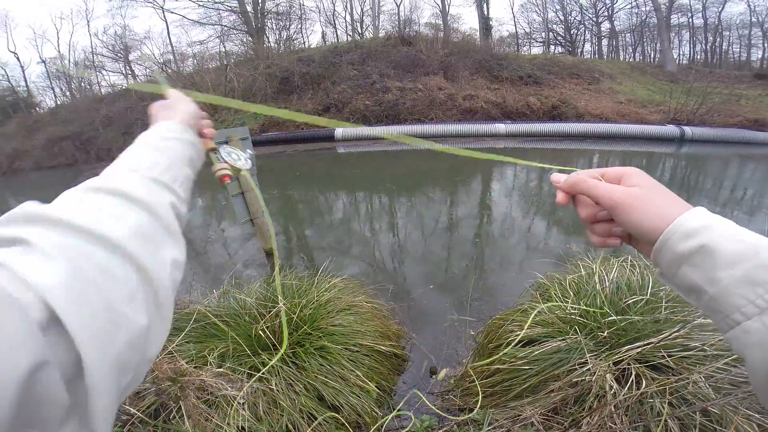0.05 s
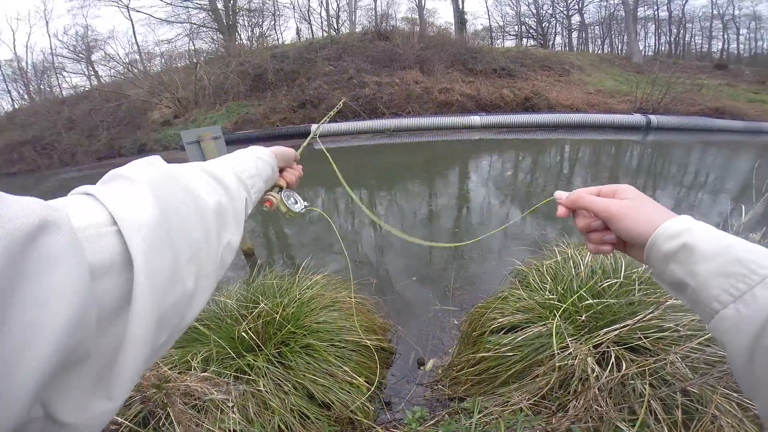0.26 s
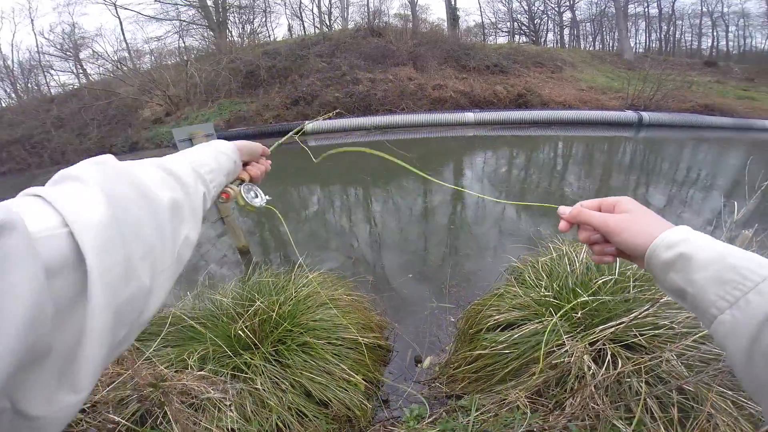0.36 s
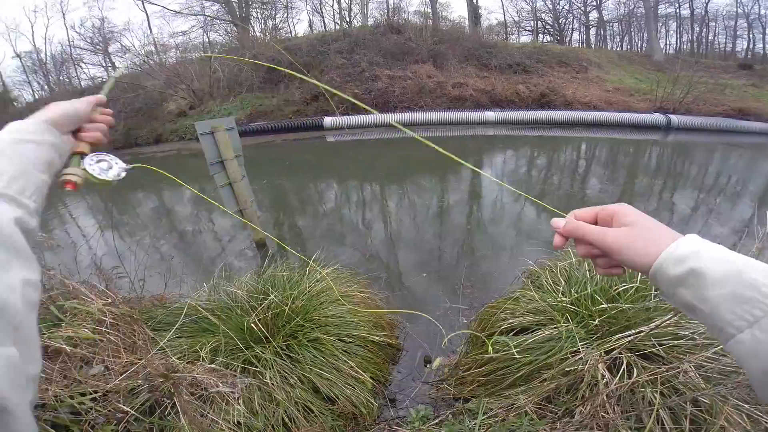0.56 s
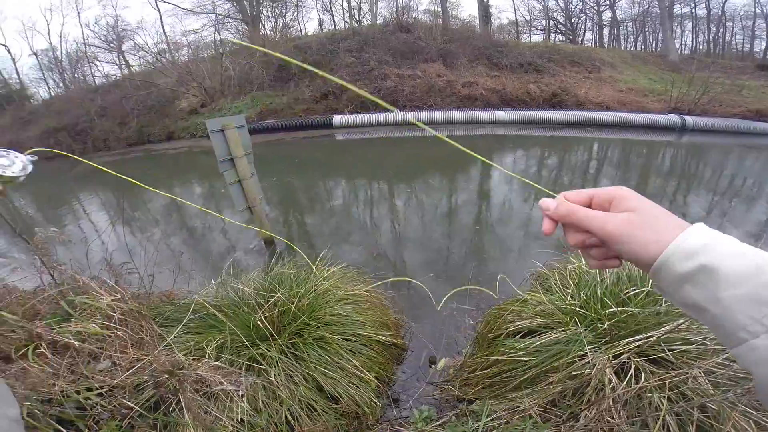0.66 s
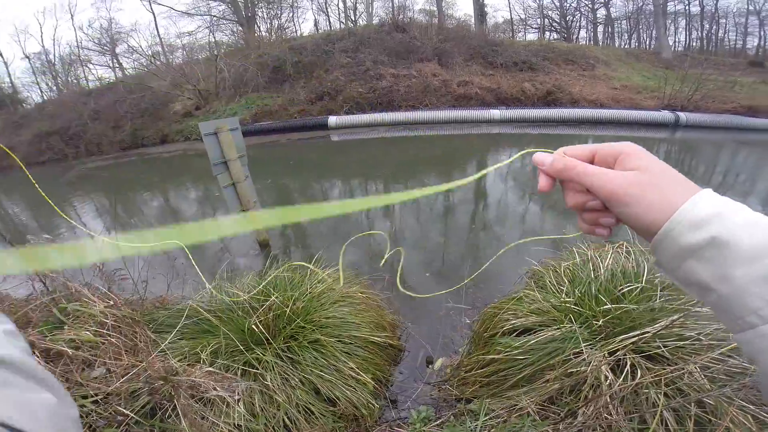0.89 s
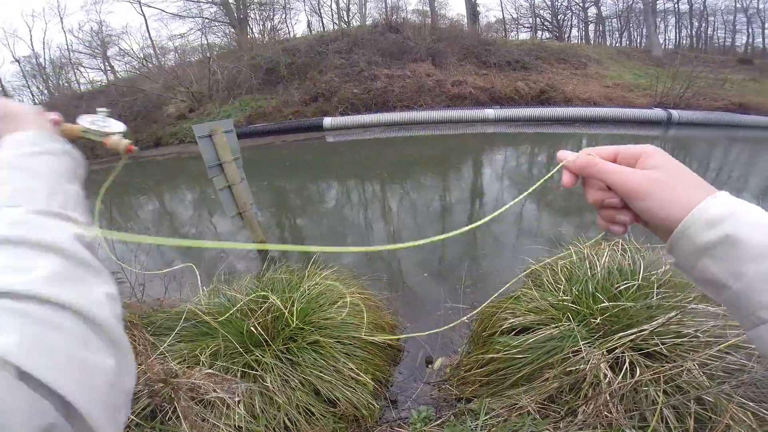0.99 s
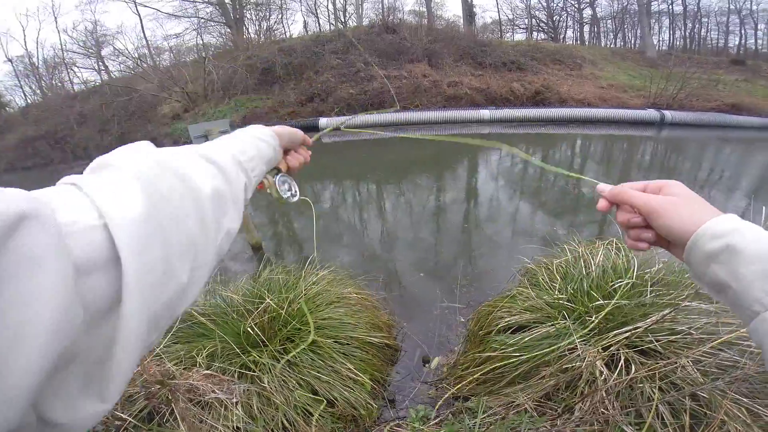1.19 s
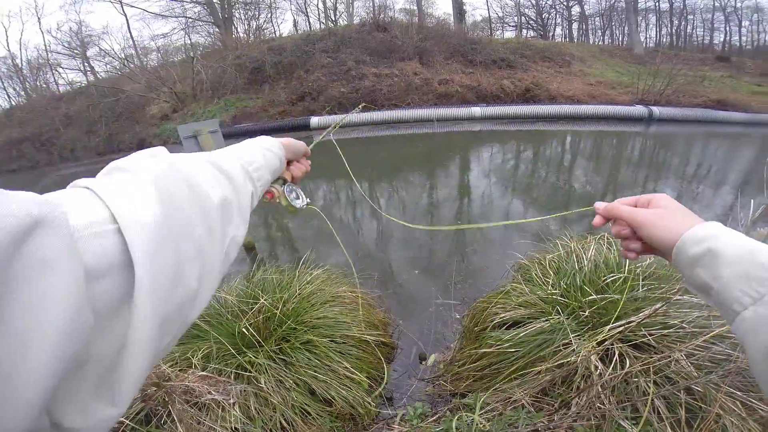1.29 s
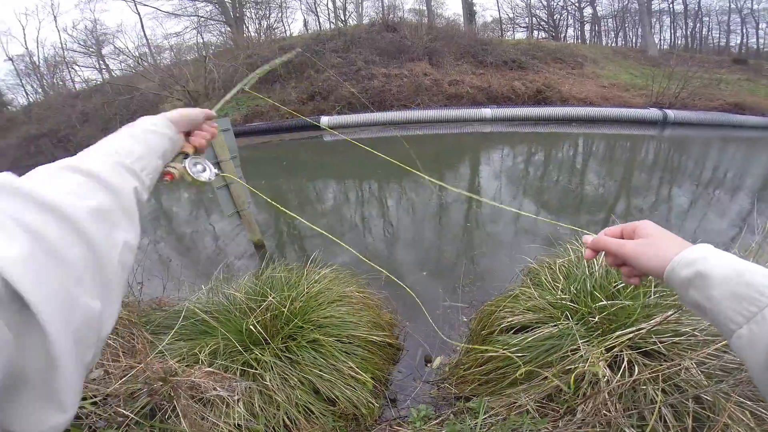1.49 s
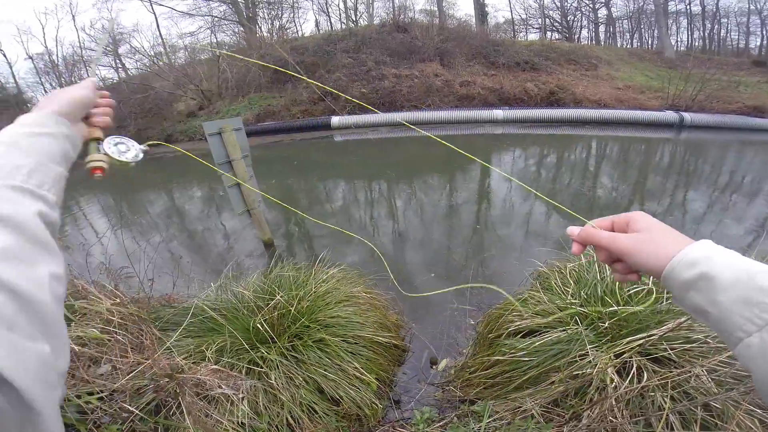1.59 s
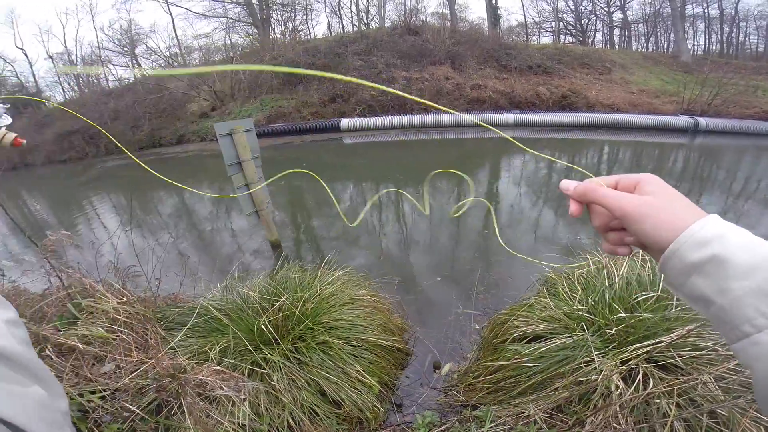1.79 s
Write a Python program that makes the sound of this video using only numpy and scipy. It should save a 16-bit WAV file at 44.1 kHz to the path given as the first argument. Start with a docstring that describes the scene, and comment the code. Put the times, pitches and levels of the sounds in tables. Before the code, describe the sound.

Fishing line rasps through a fly rod's rings from the start to 0.4 seconds, with a sharp, hollow reel knock at 0.2. A shorter rasp follows around 0.6. The reel knocks twice near 1.3 and 1.4, then ticks faintly as the line rasps again, peaking at 1.6. A sleeve rumbles and flaps softly close by. Behind are quiet open air, a very faint bird and a barely audible electronic whine.

```python
"""Fly rod false casts on a canal bank

Heard from a small camera worn on the chest. The line rasps through the rod rings on each stroke,
the reel knocks and ticks, and the sleeve and moving air rumble.
Behind it: quiet open air, a faint distant bird and a thin electronic whine."""
import sys
import numpy as np
from scipy import signal
from scipy.fft import rfft, irfft, next_fast_len
from scipy.io import wavfile
from scipy.ndimage import uniform_filter1d

SR = 44100
rng = np.random.default_rng(int(sys.argv[2]) if len(sys.argv) > 2 else 0)


def output_pcm(signal):
    """Save a mono or channel-first signal as 16-bit PCM at the path in sys.argv[1].

    Samples are clipped to [-1, 1] before scaling.
    """
    pcm = np.clip(np.atleast_2d(signal).T, -1, 1) * 32767
    wavfile.write(sys.argv[1], SR, np.round(pcm).astype(np.int16))


N = 81585

# rod resonances, for line rasp and knock tails: f/Hz, relative level/dB
ROD_SPECTRUM = [(250, -25), (600, -19), (800, -15), (1100, -14), (1400, -1.5), (1750, 1), (2100, -5.5),
                (2350, -3), (2880, -3), (3300, -15.5), (4550, -16), (5400, -20), (6600, -20), (8200, -30.5),
                (9700, -25), (11500, -26.5), (12800, -39.5), (15000, -44.5)]


def undb(db):
    return 10 ** (np.asarray(db) / 20)


def unit(x):
    """Scale to rms 1."""
    return x / np.sqrt(np.mean(x ** 2))


def curve(rows):
    """Join (t/s, value) rows by straight lines."""
    return np.interp(np.arange(N) / SR, *np.array(rows).T)


def colour(x, spectrum):
    """Minimum-phase filter from (f/Hz, level/dB) rows; output rms 1."""
    hz, db = np.array(spectrum).T
    size = 2 * next_fast_len(N)
    bins_hz = np.maximum(np.fft.rfftfreq(size, 1 / SR), 1)
    gain = undb(np.interp(np.log(bins_hz), np.log(hz), db))
    cepstrum = irfft(np.log(gain))
    cepstrum[size // 2:] = 0
    return unit(irfft(rfft(x, size) * np.exp(2 * rfft(cepstrum)))[:N])


def noise(spectrum):
    """Coloured noise, rms 1."""
    return colour(rng.standard_normal(N), spectrum)


def wander(rate_hz):
    """Smoothed random steps, rms 1."""
    hold = int(SR / rate_hz)
    steps = rng.standard_normal(N)[np.arange(N) // hold]
    return unit(uniform_filter1d(uniform_filter1d(steps, hold), hold))


def since(start_s):
    """Seconds after the start, zero before."""
    return np.maximum(np.arange(N) / SR - start_s, 0)


def sine(hz, age_s):
    return np.sin(2 * np.pi * hz * age_s)


def fade(age_s, t60_s):
    """Exponential decay from contact."""
    return (age_s > 0) * np.exp(-np.log(1000) * age_s / t60_s)


def swell(age_s, rise_s, shape):
    """Reaches 1 at rise_s, then decays."""
    return (age_s / rise_s * np.exp(1 - age_s / rise_s)) ** shape


def open_air():
    """Steady, dull outdoor noise."""
    # f/Hz, relative level/dB
    air_spectrum = [(15, -58), (25, -3), (55, -22.5), (116, -13.5), (209, -16), (433, -20), (631, -21),
                    (782, -22.5), (1270, -24.5), (1850, -29), (4620, -32.5), (8580, -39.5), (15500, -46.5)]
    return undb(-61) * noise(air_spectrum)


def camera_whine():
    """Thin, steady electronic tones."""
    # f/Hz, rms level/dB
    tones = [(8781, -75.5), (14625, -80), (14655, -89)]
    return sum(np.sqrt(2) * undb(db) * sine(hz, since(0)) for hz, db in tones)


def bird():
    """Distant gliding, fluttering notes, scattered by trees."""
    # t/s, length/s, start f/Hz, target f/Hz, level/dB, glide time constant/note length
    notes = [(0.732, .025, 5300, 5500, -60, 0.83), (0.786, 0.013, 5800, 4600, -65.5, .9),
             (1.038, .055, 7400, 4600, -62.5, .15), (1.093, 0.051, 5350, 4000, -63.5, .7),
             (1.152, 0.037, 4630, 4930, -63, .9), (1.37, 0.037, 5800, 4880, -60, 0.77)]
    flutter_db, scatter_db = 3, -6
    song, waver = np.zeros(N), 1 + .022 * wander(600)
    for start_s, length_s, from_hz, to_hz, db, glide in notes:
        progress = np.minimum(since(start_s) / length_s, 1)
        hz = (to_hz + (from_hz - to_hz) * np.exp(-progress / glide)) * waver
        envelope = np.sqrt(np.abs(np.sin(np.pi * progress)))
        song += undb(db) * envelope * np.sin(2 * np.pi * np.cumsum(hz) / SR)
    song *= unit(undb(flutter_db * wander(150)))
    echoes = rng.standard_normal(N) * fade(since(0), t60_s=.4)
    return song + undb(scatter_db) * signal.fftconvolve(song, echoes / np.linalg.norm(echoes))[:N]


def jacket():
    """Sleeve and air buffet as the arm swings; now and then the cloth flaps."""
    # buffeting envelope: t/s, relative level/dB
    swing = [(0, -62), (.06, -67.5), (.11, -52), (.2, -47.5), (.24, -42.5), (.3, -51.5), (.35, -54),
             (.45, -67.5), (.57, -53), (.7, -62.5), (1.03, -71), (1.25, -60), (1.35, -50.5), (1.41, -58.5),
             (1.53, -54), (1.63, -47.5), (1.77, -61.5), (1.85, -54)]
    # f/Hz, relative level/dB
    buffet_spectrum = [(25, -7.5), (55, -5.5), (85, -2.5), (115, 2.5), (160, -12.5), (230, -14), (330, -20),
                       (600, -27.5), (1300, -55)]
    # f/Hz, relative level/dB
    rustle_spectrum = [(100, -1), (230, 5), (400, -9.5), (1800, -9), (6000, -35), (15000, -44.5)]
    # t/s, level/dB, f/Hz
    flaps = [(0.149, -40.5, 189), (0.811, -44, 138), (.945, -47, 113), (1.17, -49, 178.2)]
    out = noise(buffet_spectrum) * undb(curve(swing) + 3)
    rustle = undb(-11) * noise(rustle_spectrum)
    for start_s, db, hz in flaps:
        age_s = since(start_s)
        out += undb(db) * swell(age_s, rise_s=.0038, shape=.87) * (sine(hz, age_s) + rustle)
    return out


def reel():
    """Each knock: sharp crack, hollow ring with short side modes, low thump, faint tail."""
    # t/s, ring level/dB, ring f/Hz, ring rise/s, side mode gain/dB, side mode tilt/(dB/octave),
    # crack peak/dB, thump level/dB, thump f/Hz
    knocks = [(0.2257, -4, 1685, 0.0016, -20, -5.5, -51, -42.5, 112),
              (0.229, -11, 1760, 0.0013, -31.5, -5, -42, -42.5, 112),
              (.679, -42, 1890, 0.0017, -57, 2, -62, -60, 120),
              (1.2846, -7, 1577, 0.0023, -14, 0, -20, -27, 165),
              (1.3649, -18.5, 1760, 0.00048, -29.5, -3, -12.5, -36, 104),
              (1.4898, -33, 1420, 0.0028, -41, -7, -55, -36.5, 101),
              (1.533, -33.5, 1450, 0.00089, -38, -2, -46, -30.5, 150),
              (1.8344, -32.5, 1650, 0.0016, -42.5, 6.5, -35.5, -33, 150)]
    # reel and rod: f/Hz, relative level/dB, t60/s
    side_modes = [(569, -30.5, 0.064), (2017, -4.5, 0.025), (2876, -3.5, 0.032), (3393, -11, 0.03),
                  (3995, -1, 0.015), (4590, 2.5, .012), (5120, -3, 0.0088), (5940, 2.5, 0.0053),
                  (6910, -3.5, .006), (9600, -10, 0.0035)]
    # f/Hz, relative level/dB
    crack_spectrum = [(400, -14.5), (900, -26.5), (1400, 5), (2800, 5.5), (3500, -24), (4500, -14),
                      (6200, -6), (8000, -23), (8800, -13), (11500, -16), (15000, -37.5)]
    pivot_hz, mode_rise_s = 3240, .0006
    out, tail = np.zeros(N), undb(-31) * noise(ROD_SPECTRUM)
    for start_s, ring_db, ring_hz, rise_s, modes_db, tilt, crack_db, thump_db, thump_hz in knocks:
        age_s = since(start_s)
        ring = swell(age_s, rise_s, shape=2.2) * sine(ring_hz, age_s)
        out += undb(ring_db) * (ring + tail * fade(age_s, t60_s=.046))
        onset = 1 - np.exp(-(age_s / mode_rise_s) ** 2)
        for hz, db, t60_s in side_modes:
            gain = undb(modes_db + db + tilt * np.log2(hz / pivot_hz))
            out += gain * onset * fade(age_s, t60_s) * sine(hz, age_s)
        impulse = np.diff(1. * (age_s > 0), prepend=0)
        grit = .1 * fade(age_s, t60_s=.0059) * rng.standard_normal(N)
        crack = colour(impulse + grit, crack_spectrum)
        out += undb(crack_db) * crack / np.abs(crack).max()
        out += undb(thump_db) * fade(age_s, t60_s=.026) * sine(thump_hz, age_s)
    return out


def fly_line():
    """Tiny catches of the line on the rings excite the rod: narrow rub when slow, rasp when fast."""
    # rasp envelope: t/s, level/dB
    first_haul = [(0, -84), (.022, -69), (.03, -55), (.06, -49), (.11, -44), (.21, -37.5), (.295, -40),
                  (.34, -46.5), (.39, -62), (.44, -63.5)]
    # t/s, level/dB
    return_run = [(.48, -57.5), (.52, -49), (.56, -44), (.6, -45), (.66, -56.5), (.71, -58.5), (.75, -67),
                  (.82, -76), (.9, -84.5)]
    # t/s, level/dB
    second_haul = [(1.2, -74), (1.28, -66), (1.3, -47.5), (1.35, -47.5), (1.395, -60), (1.44, -50.5),
                   (1.52, -47.5), (1.57, -40.5), (1.62, -39), (1.7, -46), (1.77, -50.5), (1.85, -65)]
    # gently rubbed rod: f/Hz, relative level/dB
    rub_spectrum = [(600, -35.5), (1350, -13), (1750, -0.5), (2150, -13), (2900, -11.5), (3400, -20),
                    (4550, -13), (6000, -23.5), (12000, -49.5)]
    catches_per_s, spread_db, flicker_db = 14000, 1.82, 1.14
    treble_hz, full_run_db = 5300, -39.5
    run_db = curve(first_haul + return_run + second_haul)
    below_full_db = full_run_db - run_db
    catches = (rng.random(N) < catches_per_s / SR) * rng.standard_normal(N)
    catches *= undb(spread_db * rng.exponential(size=N))
    rasp = colour(catches, ROD_SPECTRUM)
    # treble and rub fade more slowly than the rest of the rasp
    treble = signal.sosfiltfilt(signal.butter(2, treble_hz, "high", fs=SR, output="sos"), rasp)
    rasp += treble * (undb(.12 * below_full_db) - 1)
    rub = noise(rub_spectrum) * undb(-50 - .5 * below_full_db)
    return (rasp * undb(run_db) + rub) * undb(flicker_db * wander(65))


def scene():
    return (fly_line() + reel() + jacket() + bird() + camera_whine() + open_air())[None]


def record(dry):
    """The camera's steep low-pass."""
    cutoff_hz = 15500
    return signal.sosfilt(signal.ellip(8, .2, 70, cutoff_hz, fs=SR, output="sos"), dry)


dry = scene()
out = record(dry)
output_pcm(out)
```